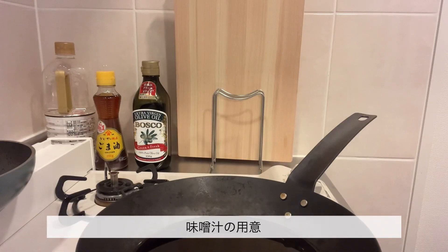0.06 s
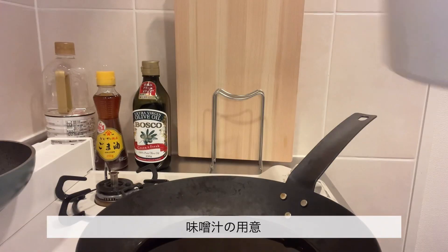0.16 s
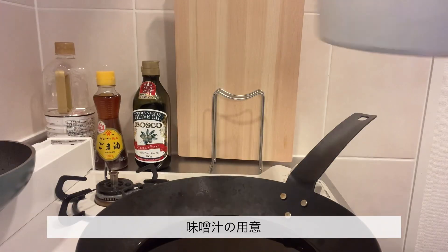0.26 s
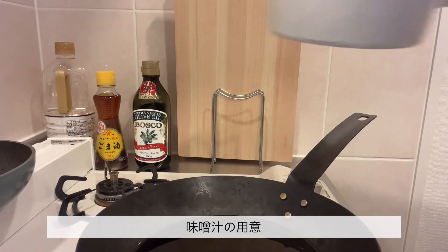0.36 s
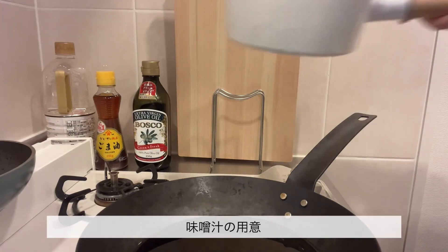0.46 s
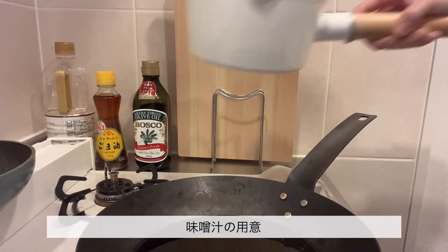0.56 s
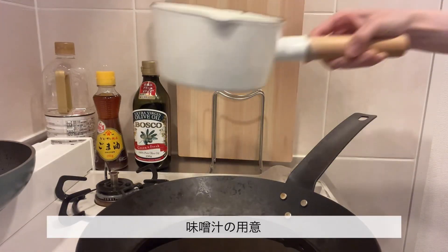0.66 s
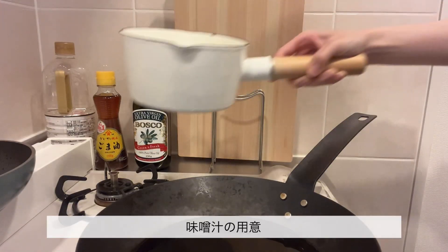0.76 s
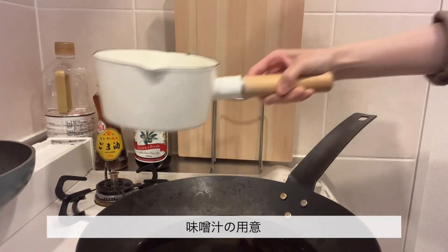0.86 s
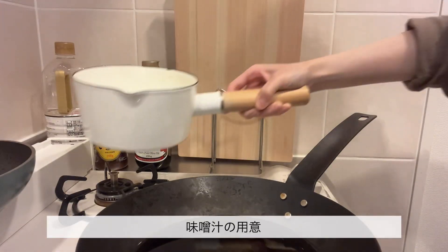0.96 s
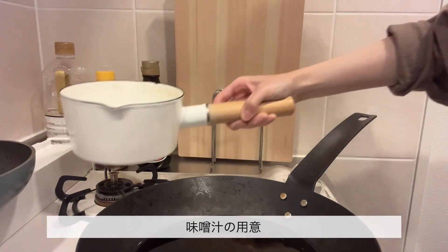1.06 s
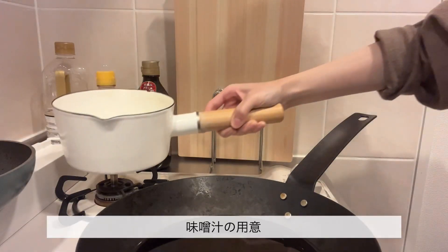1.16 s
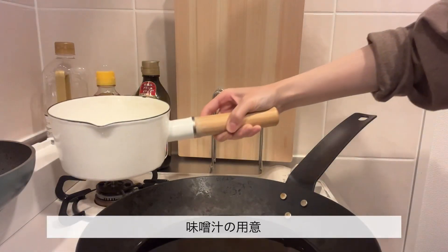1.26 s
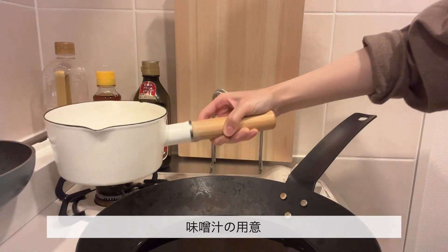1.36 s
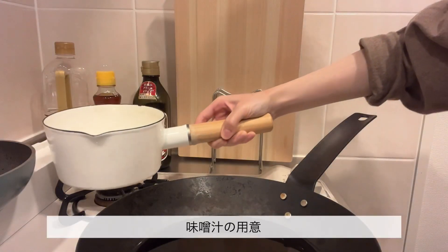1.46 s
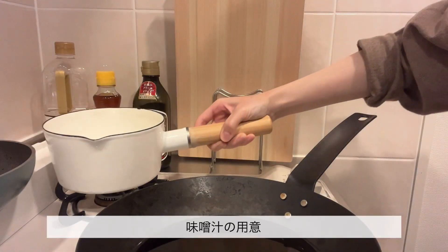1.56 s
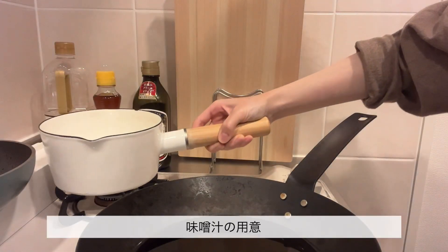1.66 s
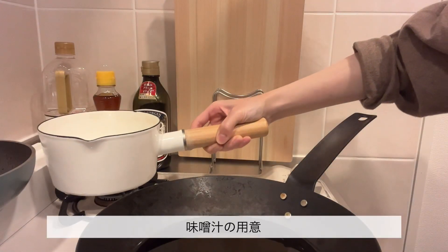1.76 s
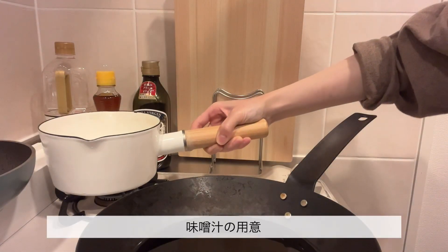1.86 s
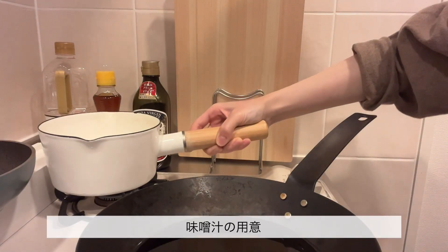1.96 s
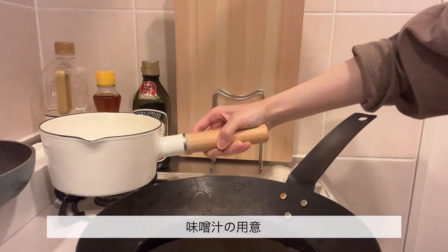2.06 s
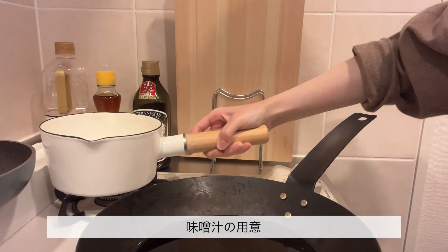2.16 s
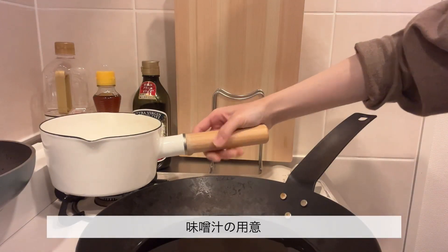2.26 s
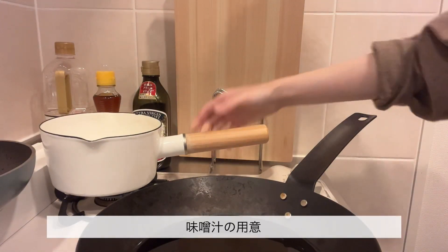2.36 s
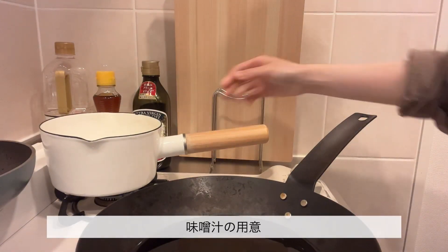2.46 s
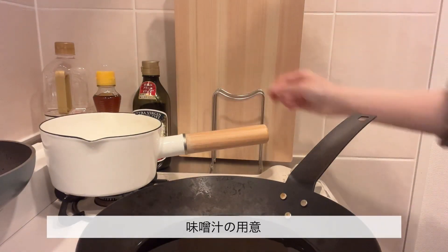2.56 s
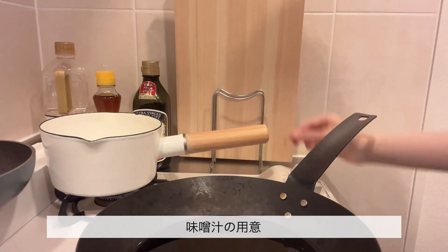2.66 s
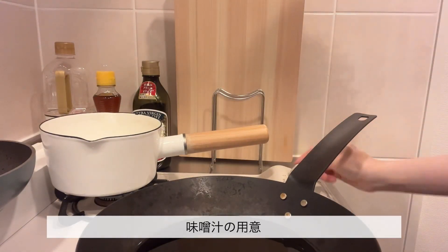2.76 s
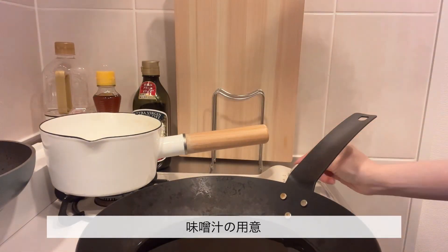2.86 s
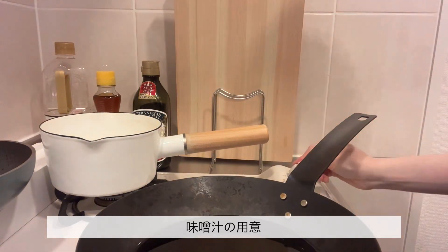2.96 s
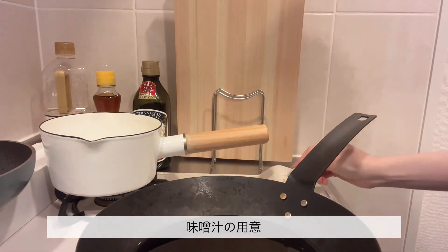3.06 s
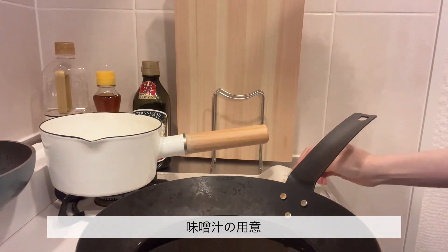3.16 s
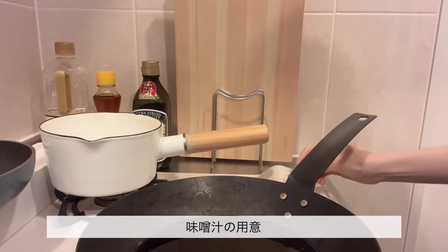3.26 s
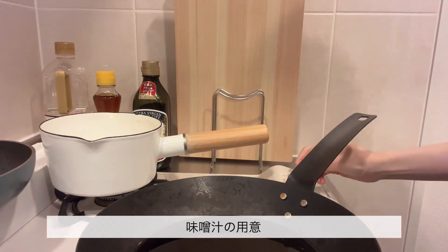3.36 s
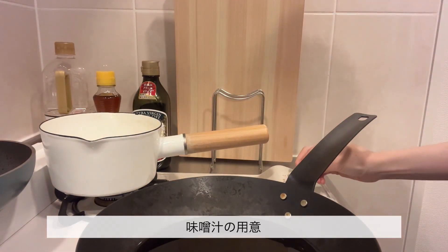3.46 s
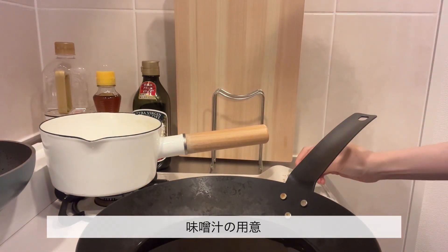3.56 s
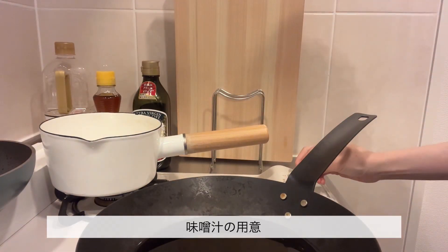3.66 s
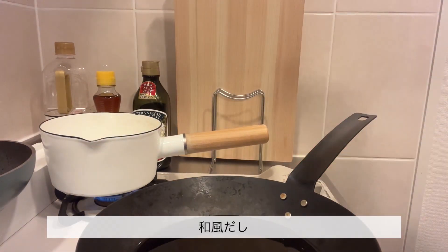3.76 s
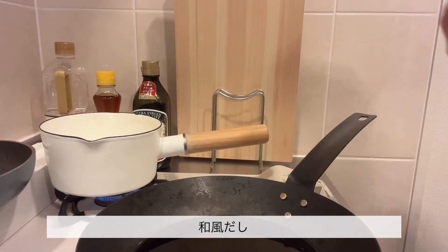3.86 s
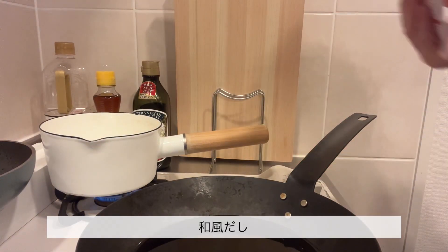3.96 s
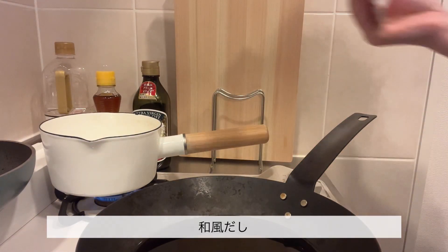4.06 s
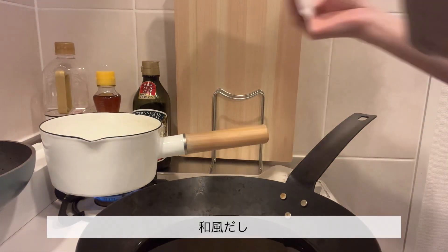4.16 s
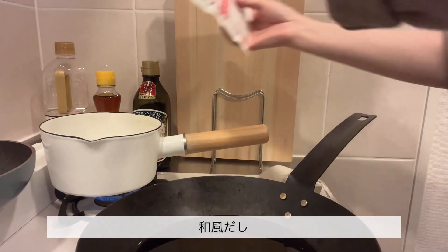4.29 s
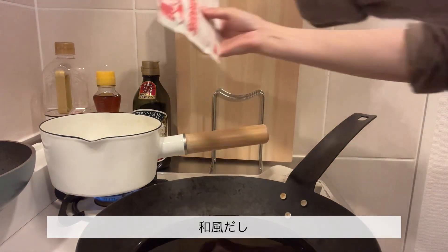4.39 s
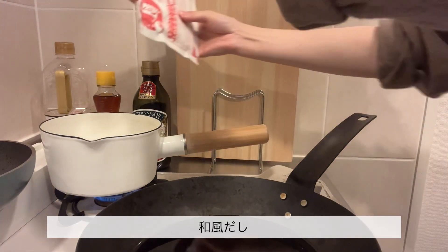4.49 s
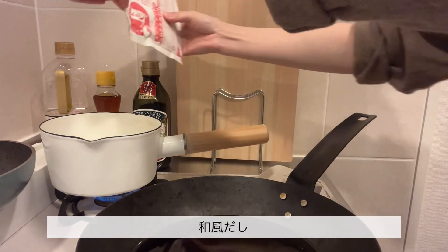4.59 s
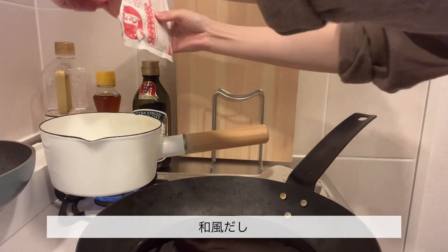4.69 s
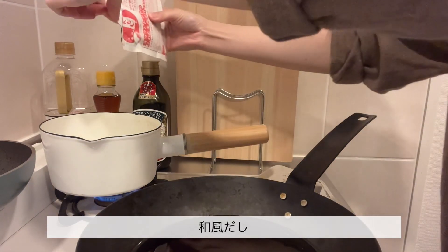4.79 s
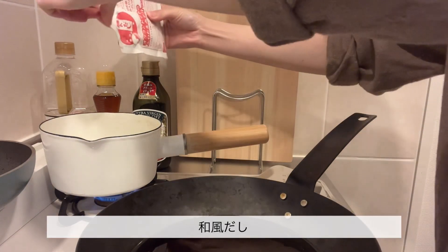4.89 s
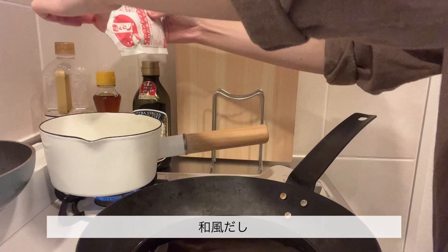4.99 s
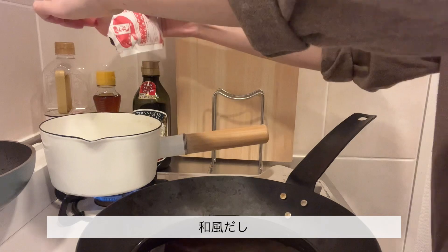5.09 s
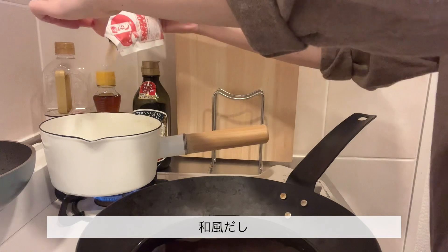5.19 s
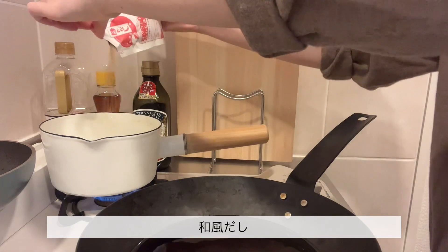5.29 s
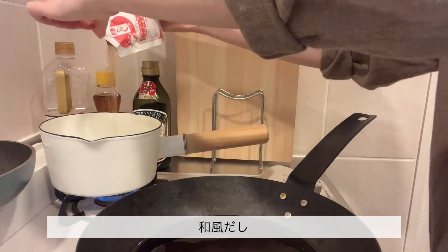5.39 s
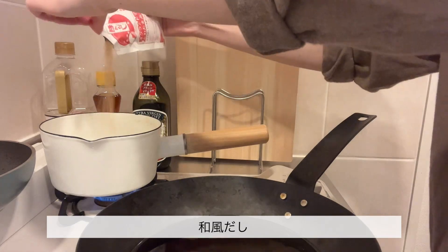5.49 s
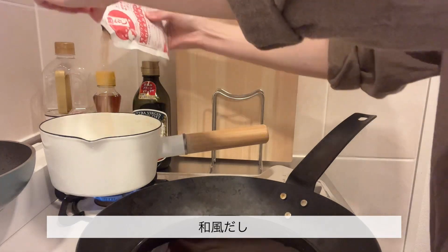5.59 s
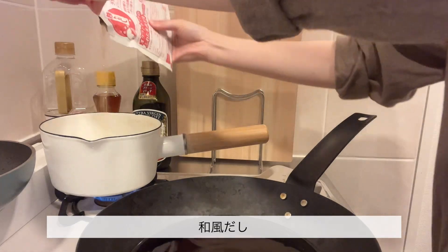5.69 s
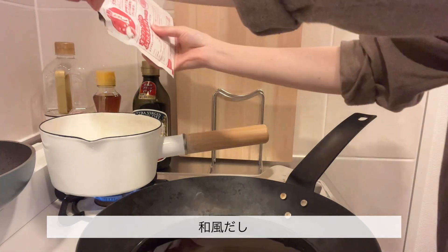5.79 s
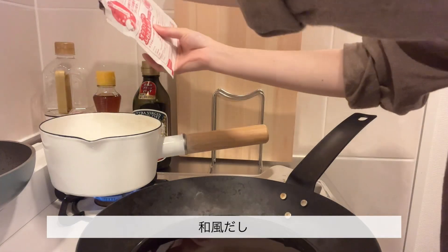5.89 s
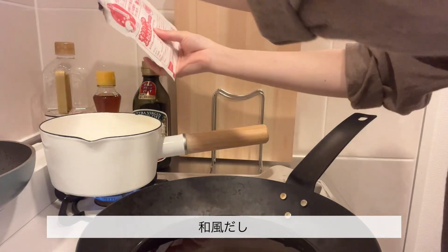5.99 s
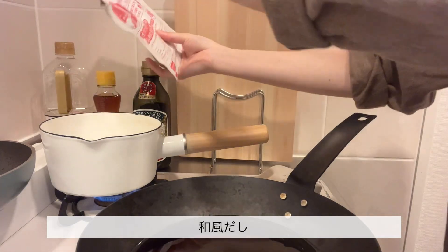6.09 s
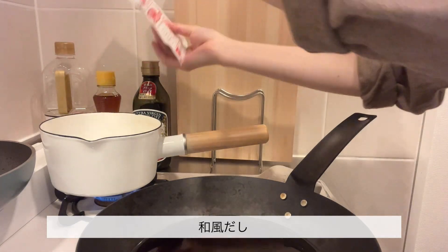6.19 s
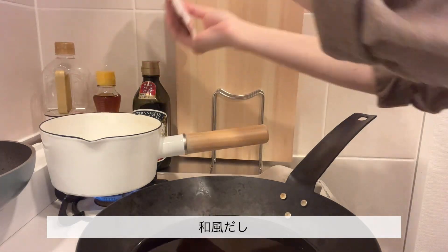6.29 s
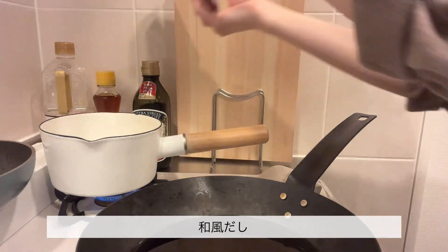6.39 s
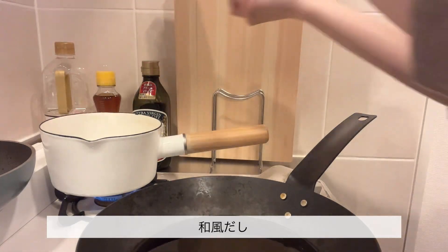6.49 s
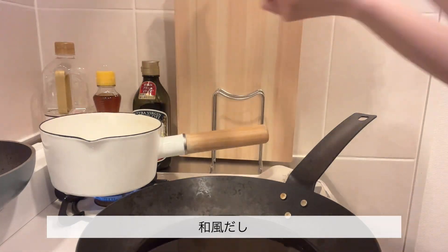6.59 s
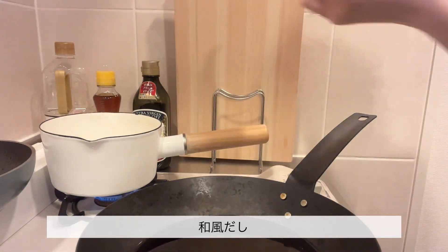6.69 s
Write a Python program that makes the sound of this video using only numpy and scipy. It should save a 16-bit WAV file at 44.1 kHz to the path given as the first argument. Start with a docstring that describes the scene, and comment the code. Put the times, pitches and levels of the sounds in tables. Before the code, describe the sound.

In a small tiled kitchen with a steady low extractor hum, an enamel saucepan knocks and clatters onto an iron stove grate. An ignition button clunks in, three sharp sparks snap evenly, gas hisses and the button springs back. Dry granules slide from a paper sachet into the pan with light finger taps, then paper rustles away. Close stereo microphone, short room tail.

```python
"""Saucepan on a gas stove

An enamel saucepan knocks onto its grate in a tiled kitchen: shaped noise bursts drive decaying modes.
The ignition button clicks in, three sparks snap, filtered noise hisses as gas and the button springs back.
Stock granules slide from a paper sachet as dense random grains; it is tapped, then rustles away.
An extractor fan hums below as noise in duct resonances."""
import sys
import numpy as np
from scipy import signal
from scipy.fft import rfft, irfft, next_fast_len
from scipy.io import wavfile

SR = 44100
rng = np.random.default_rng(int(sys.argv[2]) if len(sys.argv) > 2 else 0)


def master(y):
    """Save y as 16-bit WAV."""
    cut = np.clip(np.atleast_2d(y).T, -1, 1)
    pcm = np.round(cut * 32767)  # scale
    wavfile.write(sys.argv[1], SR, pcm.astype(np.int16))


N = 297234
TIME = np.arange(N) / SR  # s
SIZE = next_fast_len(N + SR, real=True)  # room for filter tails
FREQ = np.maximum(np.fft.rfftfreq(SIZE, 1 / SR), 1)  # Hz


def undb(db):
    """Logarithmic level: decibels to amplitude gain."""
    return 10 ** (np.asarray(db) / 20)


def contour(points, hz=FREQ):
    """Spectral envelope: (f/Hz, value) points joined by straight lines on a log-frequency axis."""
    f, value = np.transpose(points)
    return np.interp(np.log(hz), np.log(f), value)


def lift(resonances):
    """Resonance: the summed dB curve of bell-shaped peaks or hollows (f/Hz, width/Hz, lift/dB)."""
    return sum(db / (1 + (2 * (FREQ - hz) / width) ** 2) for hz, width, db in resonances)


def colour(x, db):
    """Linear filtering: weight the spectrum of a long sound by a dB value for each frequency."""
    return irfft(rfft(x, SIZE) * undb(db), SIZE)[..., :N]


def unit(x):
    """Normalization: scale to rms 1."""
    return x / np.sqrt(np.mean(x ** 2))


def walk(rate):
    """Slow modulation: random knots, rate per second, joined linearly; typical spread 0.6."""
    knots = rng.standard_normal(N // 100)
    return 0.71 * np.interp(TIME * rate, np.arange(len(knots)), knots)


def gesture(start, length, attack, release):
    """Amplitude envelope: rounded attack and release (s) within the length; they overlap if it is short."""
    rise = np.clip((TIME - start) / attack, 0, 1)
    fall = np.clip((start + length - TIME) / release, 0, 1)
    return (np.sin(np.pi / 2 * rise) * np.sin(np.pi / 2 * fall)) ** 2


def crack(rise_s, *spectra, size=8192, alike=.6):
    """Impact excitation: a brief rough contact, minimum-phase filtered by the struck parts' spectra."""
    t = np.arange(size) / SR
    hz = np.maximum(np.fft.rfftfreq(size, 1 / SR), 1)
    swell = t / rise_s * np.exp(1 - t / rise_s)  # peaks at rise_s
    # the direct sound reaches both microphones; near reflections differ
    shared = np.sqrt(alike) * rng.standard_normal(size)
    separate = np.sqrt(1 - alike) * rng.standard_normal((2, size))
    contact = rfft(swell * (shared + separate))
    # so short a blow drives all frequencies fairly evenly: flatten part of the random spectrum
    uneven = np.sqrt(.5 + .5 * abs(contact) ** 2 / np.sum(swell ** 2))
    target = undb(sum(contour(s, hz) for s in spectra))
    # folding the cepstrum onto positive times makes the filter causal
    cepstrum = irfft(np.log(target / uneven))
    cepstrum[:, 1:size // 2] *= 2
    cepstrum[:, size // 2 + 1:] = 0
    return irfft(contact * np.exp(rfft(cepstrum)))


def place(events):
    """Superposition: add (t/s, sound) pairs on the stereo time line."""
    out = np.zeros((2, SIZE))
    for s, sound in events:
        start = int(s * SR)
        out[:, start:start + sound.shape[1]] += sound
    return out[:, :N]


def grains(per_s, spread_db, smooth):
    """Shot noise: dense tiny impacts of uneven size over a smooth rubbing hiss."""
    hits = rng.random(N) < per_s / SR
    strength = undb(spread_db * np.minimum(rng.exponential(size=N), 4))
    impacts = unit(hits * strength * rng.standard_normal((2, N)))
    hiss = smooth * rng.standard_normal((2, N))
    return unit(impacts + hiss)


# spectrum of the fan's air noise: (f/Hz, level/dB)
FAN_TONE = [(22, -57), (45, -29), (90, -18), (160, -25), (270, -32), (400, -46.5), (700, -38),
            (1700, -47.5), (2600, -50.5), (4200, -63), (6300, -72.5), (9000, -67.5), (12500, -68),
            (15500, -76)]
# resonances of the fan and its duct: (f/Hz, width/Hz, lift/dB)
DUCT = [(109.5, 5.9, 2), (287.2, 15.3, 8), (342, 73, 2), (440, 42, 5.5), (597, 5, 7.5), (721, 37, 7.5),
        (845, 41, -6), (1132, 47, 8), (1480, 56, 8.5), (1720, 66, 6.5), (2210, 23, 12.5)]


def fan():
    """Turbulence noise: steady moving air excites the resonances of the extractor duct."""
    air = colour(rng.standard_normal((2, N)), contour(FAN_TONE) + lift(DUCT))
    waver_db = .2 * walk(3)
    return air * undb(waver_db)


# spectrum of the gas hiss, before its envelope: (f/Hz, level/dB)
GAS_TONE = [(400, -48.5), (1200, -54.5), (2500, -54), (4000, -49), (5500, -53), (8000, -52), (10500, -53.5),
            (15500, -62)]
GAS_OPEN_S, VALVE_S = 3.772, 0.0044  # opening time and rise time
RUSH_S, RUSH_RELEASE_S, RUSH_DB = 0.24, 0.19, 0
FLAME_DB, FLAME_SETTLE_DB_PER_S = -0.5, 6


def burner():
    """Jet noise: gas rushes through the jet, then settles to a steadily quieter, fluttering flame."""
    hiss = colour(rng.standard_normal((2, N)), contour(GAS_TONE))
    since = np.maximum(TIME - GAS_OPEN_S, 0)
    rush = undb(RUSH_DB) * gesture(GAS_OPEN_S, RUSH_S, VALVE_S, RUSH_RELEASE_S)
    flame = undb(FLAME_DB - FLAME_SETTLE_DB_PER_S * since) * np.minimum(since / VALVE_S, 1)
    flutter = undb(1.3 * walk(29))
    return hiss * (rush + flame) * flutter


# ignition button going in: (t/s, thud level/dB, rattle level/dB, latch click level/dB)
PRESS = [(3.013, -14, -2, 6), (3.023, 1, 0, -4), (3.03, 5, 7, 4.5), (3.038, 5, 9, -2), (3.056, -8, 5, -6)]
# spectrum of the button going in: (f/Hz, level/dB)
PRESS_TONE = [(40, -49), (100, -36), (200, -9.5), (330, -27), (550, -27), (1100, -32), (2200, -44),
              (4000, -43.5), (5600, -40), (6350, -25), (7100, -46), (9300, -40), (10700, -27), (12000, -44),
              (15500, -43)]
# spectrum of a spark, before its gain: (f/Hz, level/dB)
SPARK_TONE = [(300, -52), (1100, -34), (1700, -47), (2300, -33), (3000, -36.5), (4000, -32.5),
              (5200, -36.5), (6800, -30), (8000, -23.5), (9700, -24.5), (11000, -28), (13000, -27),
              (15300, -30)]
# button springing back, a scrape and then the stop: (t/s, contact rise/s, gain/dB)
RELEASE = [(3.8027, .001, 5), (3.8054, .0006, 15.3)]
# spectrum of the button springing back, before its gain: (f/Hz, level/dB)
RELEASE_TONE = [(100, -50), (300, -35), (700, -33), (1100, -29), (1600, -32), (2200, -22.5), (2850, -25.5),
                (3600, -20), (4500, -18.5), (5200, -31.5), (8000, -27.5), (12000, -34.5), (15500, -40)]
# resonances of the steel front panel around the igniter: (f/Hz, width/Hz, lift/dB)
PANEL = [(2250, 250, 1.5), (2750, 150, 2), (3020, 200, -4), (3500, 200, 2), (3880, 200, 2.5)]
# the igniter fires at a steady rate
FIRST_SPARK_S, SPARK_PERIOD_S, SPARK_COUNT, SPARK_GAIN_DB = 3.308, 0.1735, 3, 10


def igniter(press_rise_s=0.002, spark_rise_s=0.0015):
    """Impulsive excitation: latch blows, spark snaps and the spring's return sound through the panel."""
    press = place((s, crack(press_rise_s, PRESS_TONE, [(220, thud), (900, rattle), (4000, click)]))
                  for s, thud, rattle, click in PRESS)
    sparks = place((FIRST_SPARK_S + k * SPARK_PERIOD_S,
                    undb(SPARK_GAIN_DB) * crack(spark_rise_s, SPARK_TONE))
                   for k in range(SPARK_COUNT))
    release = place((s, undb(db) * crack(rise_s, RELEASE_TONE)) for s, rise_s, db in RELEASE)
    return colour(press + sparks + release, lift(PANEL))


# finger taps: (t/s, hollow knock level/dB, knock pitch f/Hz, paper snap level/dB, snap pitch f/Hz)
TAPS = [(4.9197, -20, 480, -20.5, 2100), (5.22, -20, 650, -20.5, 1200), (5.412, -17, 620, -16.5, 1750),
        (6.2064, -16.5, 880, -29, 3100)]
# spectrum of a knock or snap of the sachet: (multiple of its pitch, level/dB)
TAP_TONE = [(.2, -14), (.65, -9), (1, -1), (1.55, -6), (2.2, -16), (8, -29)]


def fingers(knock_rise_s=0.0022, snap_rise_s=0.0012):
    """Impact sound: each dry tap knocks the hollow sachet and makes its paper snap."""
    def tap(rise_s, db, hz):
        """Scaling: one spectral shape moved to the given pitch and level."""
        return undb(db) * crack(rise_s, np.multiply(TAP_TONE, (hz, 1)))

    return place((s, tap(knock_rise_s, knock_db, knock_hz) + tap(snap_rise_s, snap_db, snap_hz))
                 for s, knock_db, knock_hz, snap_db, snap_hz in TAPS)


# tilts letting granules slide: (t/s, length/s, level/dB, mean share falling into the pan 0-1)
TILTS = [(4.265, .5, -40, 0), (4.639, .33, -41, 0), (4.828, 0.88, -40.5, .75)]
# spectral shape of sliding granules: (f/Hz, relative level/dB)
POUR_TONE = [(500, -48), (1200, -47.5), (2200, -41), (3200, -37.5), (3900, -35.5), (4700, -37),
             (7300, -34.5), (10000, -37), (12500, -41), (15500, -44.5)]
# notes of the empty pan under falling granules: (f/Hz, width/Hz, lift/dB)
PAN_PATTER = [(1710, 130, 4), (2050, 90, 3), (2450, 140, 3), (3800, 200, 5), (4100, 150, 3.5)]
# strokes of sleeve and paper as the arm moves: (t/s, length/s, level before the rub gain/dB)
STROKES = [(0, 0.53, -75), (2.89, .15, -66), (3.932, 0.091, -50), (4.22, .24, -55), (5.786, 0.076, -64),
           (5.883, 0.082, -64), (6.008, 0.15, -66), (6.123, 0.27, -55.5), (6.334, .16, -37),
           (6.465, .15, -37.5), (6.552, 0.2, -56.5)]
# spectral shape of rubbing fibres: (f/Hz, relative level/dB)
RUSTLE_TONE = [(600, -48), (1200, -38), (2500, -34), (3800, -29), (6000, -31.5), (8000, -28.5),
               (10500, -31), (12500, -36), (15500, -40.5)]
SLIDE_ATTACK_S, SLIDE_RELEASE_S = 0.16, 0.28
STROKE_ATTACK_S, STROKE_RELEASE_S = 0.056, 0.09


def sachet(rub_gain_db=4.0, flow_db=0.2, catch_db=1.2):
    """Granular friction: granules slide over paper and patter into the pan; paper and sleeve rub."""
    granules = grains(per_s=2600, spread_db=2.4, smooth=.8)
    fibres = grains(per_s=6000, spread_db=1.8, smooth=1)
    on_paper = unit(colour(granules, contour(POUR_TONE)))
    in_pan = unit(colour(granules, contour(POUR_TONE) + lift(PAN_PATTER)))
    # uneven dribbles vary the share that lands in the pan
    dribble = 1 + .5 * walk(14)
    pour = 0
    for s, length, db, falling in TILTS:
        share = np.clip(falling * dribble, 0, 1)
        mix = on_paper + share * (in_pan - on_paper)
        pour = pour + undb(db) * gesture(s, length, SLIDE_ATTACK_S, SLIDE_RELEASE_S) * mix
    rub = unit(colour(fibres, contour(RUSTLE_TONE)))
    motion = sum(undb(db) * gesture(s, length, STROKE_ATTACK_S, STROKE_RELEASE_S)
                 for s, length, db in STROKES)
    return pour * undb(flow_db * walk(40)) + rub * motion * undb(rub_gain_db + catch_db * walk(90))


# pan meets grate: (t/s, contact rise/s, stove-top thud level/dB, iron clank level/dB, clank centre f/Hz,
# clank focus/dB, enamel tick level beside its peak/dB, tick pitch f/Hz)
PAN_KNOCKS = [(1.498, 0.0024, -27, 10, 2850, 10, 7, 4300), (1.7515, 0.0017, -7.5, 7, 950, 0, -8, 4300),
              (1.758, 0.0035, -4, 2, 900, 0, -8, 4750), (1.7745, 0.0022, 2, 3, 900, 3, 2.5, 4400),
              (1.779, .003, 7, 5, 1400, 1, 2, 6600), (1.797, .004, -1, -3.5, 700, 1, -15, 5600),
              (1.817, 0.0022, 3, 0, 1000, 1, -14, 5600), (1.8434, 0.0012, 4, -3.5, 700, 0, -17, 5600),
              (2.0146, .0026, -12, 8, 1300, 10, -4, 6220), (2.066, 0.0031, -1, 2.5, 700, 6, -1, 4750)]
# spectrum of a knock, to which the drive is added: (f/Hz, level/dB)
PAN_BODY = [(60, -35), (110, -6.5), (300, -17), (700, -19.5), (1300, -22.5), (1900, -24.5), (2800, -31.5),
            (3600, -34), (6500, -37), (11000, -41), (15500, -49)]
# ring of the pan on its grate: (f/Hz, relative level/dB, t60/s)
PAN_MODES = [(110.4, 2, .33), (164, -8, .28), (194.3, -6, 0.31), (241, -7, .25), (284, -7, .24),
             (440, -13, .28), (523, -10, .22), (575, -10, .24), (690, -6, .24), (782, -10, .22),
             (1000, -11, .13), (1325, -6, .09), (1480, -1, .06), (1770, -2, .09), (2220, -7.5, .06),
             (2500, -4, .09), (2840, -6, .06), (3150, -5, .05), (4050, -10, .08), (5200, -10, .06),
             (5480, -7, .06), (5600, -4, .055), (7020, -9, .04)]
# broad resonances and hollows of the enamel wall: (f/Hz, width/Hz, lift/dB)
PAN_WALL = [(465, 94, -3.5), (1775, 110, 7), (1970, 180, -9), (2540, 200, 2.5), (3450, 250, -5),
            (4350, 200, 1), (5560, 260, 2.5), (5980, 250, -6)]
CLANK_SPAN = 1.3  # frequency ratio from the clank's centre at which it has fallen by its focus
TICK_SPAN, TICK_LIFT_DB = 1.06, 7  # half-width (frequency ratio) and height of the enamel tick's peak
MODE_SCATTER_DB = 1.5  # each point of contact favours different modes
CHOKE = 0.17  # dB of ring lost for each dB of thud: the weight of the pan damps it


def pan(rattle_t60=0.17, rattle_db=-42, ring_db=-45):
    """Modal synthesis: each knock shakes stove top and loose grate and sets decaying pan modes ringing."""
    t = TIME[:SR // 2]
    blows, rings = [], []
    for s, rise_s, thud, clank, clank_hz, focus, tick, tick_hz in PAN_KNOCKS:
        # where and how hard it lands decides which parts answer
        drive = [(220, thud),
                 (clank_hz / CLANK_SPAN, clank - focus),
                 (clank_hz, clank),
                 (clank_hz * CLANK_SPAN, clank - focus),
                 (tick_hz / TICK_SPAN, tick),
                 (tick_hz, tick + TICK_LIFT_DB),
                 (tick_hz * TICK_SPAN, tick)]
        blows.append((s, crack(rise_s, PAN_BODY, drive)))
        modes = np.zeros(len(t))
        for hz, db, t60 in PAN_MODES:
            mode_db = db + contour(drive, hz) + MODE_SCATTER_DB * rng.standard_normal()
            modes += undb(mode_db - 60 * t / t60) * np.sin(2 * np.pi * (hz * t + rng.random()))
        # a grazed pan rings freely, one pressed on the iron is choked
        onset = 1 - np.exp(-t / rise_s)
        rings.append((s, undb(ring_db - CHOKE * thud) * onset * modes[None]))
    blows = colour(place(blows), lift(PAN_WALL))
    rattle = undb(rattle_db - 60 * t / rattle_t60) * rng.standard_normal((2, len(t)))
    return blows + signal.fftconvolve(blows, rattle, axes=1)[:, :N] + place(rings)


# reverberation time of the kitchen: (f/Hz, t60/s)
KITCHEN_T60 = [(150, 0.46), (500, 0.41), (2000, 0.21), (6000, 0.25), (14000, 0.15)]


def kitchen(x, wet_db, size=256):
    """Reverberation: tiles close by return a short diffuse tail, which lasts longest in the bass."""
    hz, t, noise = signal.stft(rng.standard_normal((2, SR // 2)), SR, nperseg=size)
    decay = undb(-60 * t / contour(KITCHEN_T60, np.maximum(hz, 1))[:, None])
    tail = signal.istft(noise * decay, SR)[1]
    tail = tail * (TIME[:tail.shape[1]] > .002)  # no reflection in the first 2 ms
    tail = undb(wet_db) * unit(tail) / np.sqrt(tail.shape[1])
    return x + signal.fftconvolve(x, tail, axes=1)[:, :N]


def scene():
    """Superposition: stove and sachet with their room tails, over the fan."""
    stove = kitchen(pan() + burner() + sachet(), wet_db=-3.0)
    button = kitchen(igniter(), wet_db=-4.0)
    taps = kitchen(fingers(), wet_db=-8.0)
    return stove + button + taps + fan()


# level difference between the microphones: (f/Hz, left minus right level/dB)
BALANCE_DB = [(100, -.5), (1200, -1), (2500, -0.5), (4200, -3.5), (6000, -3), (7300, 1), (10000, 0)]
TOP_HZ = 16100  # upper band limit


def record(dry):
    """Interchannel coherence: a stereo pair alike in bass and top treble, wide between, band-limited."""
    left, right = rfft(dry, SIZE)
    # (f/Hz, likeness 0-1)
    likeness = contour([(200, .98), (300, 0.81), (450, 0.056), (1200, 0.25),
                        (5000, 0.034), (6500, 0.3), (8000, 1.0)])
    right = likeness * left + np.sqrt(1 - likeness ** 2) * right
    # above 5650 Hz the right channel lags by one more turn of phase every 5150 Hz
    turn = 2 * np.pi * np.maximum(FREQ - 5650, 0) / 5150
    right = right * np.exp(-1j * turn)
    balance = undb(np.outer([.5, -.5], contour(BALANCE_DB)))
    pair = irfft(np.array([left, right]) * balance, SIZE)[:, :N]
    return signal.sosfilt(signal.ellip(8, .2, 70, TOP_HZ, fs=SR, output="sos"), pair)


dry = scene()
out = record(dry)
master(out)
```